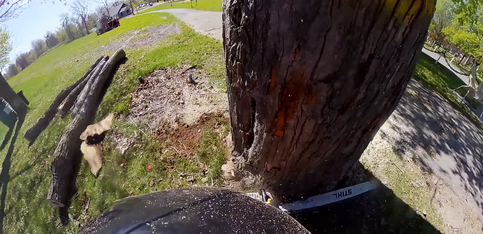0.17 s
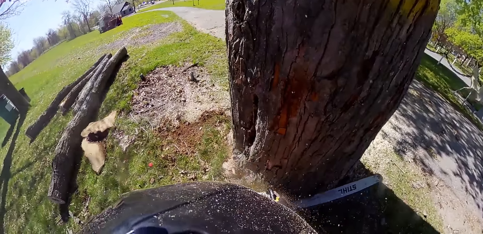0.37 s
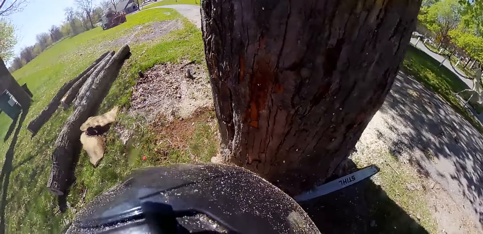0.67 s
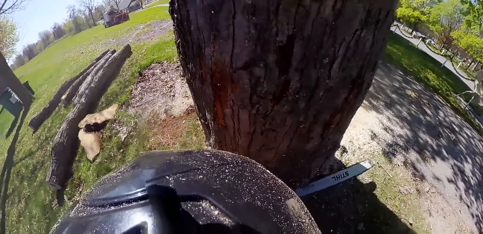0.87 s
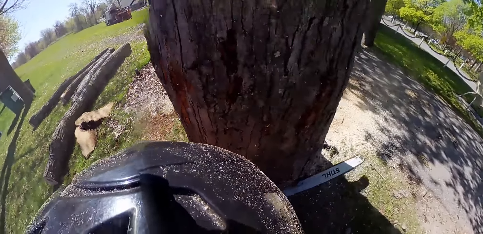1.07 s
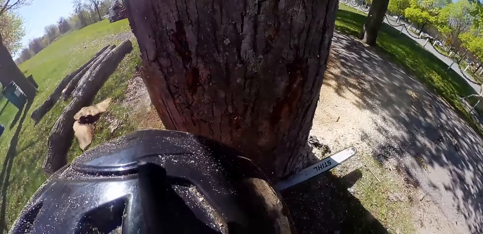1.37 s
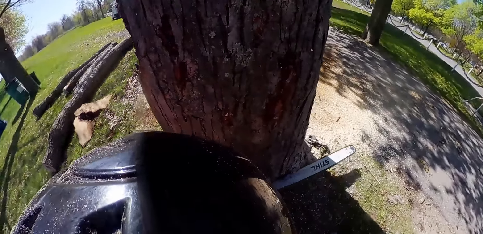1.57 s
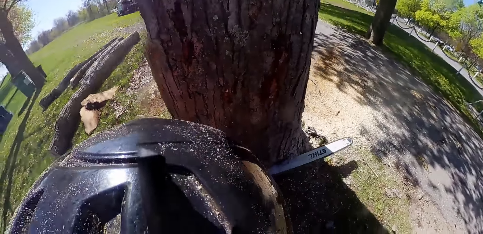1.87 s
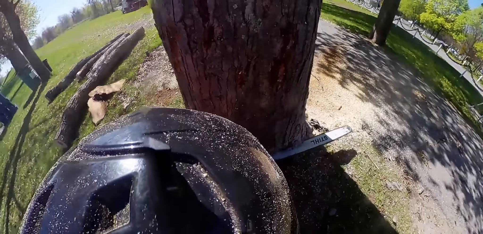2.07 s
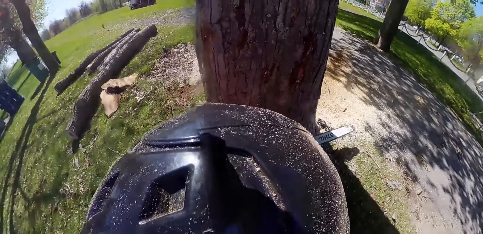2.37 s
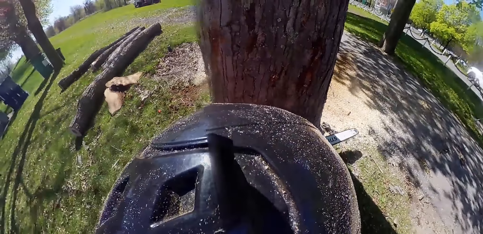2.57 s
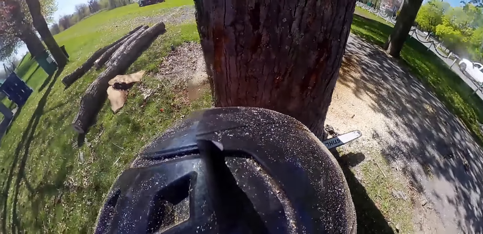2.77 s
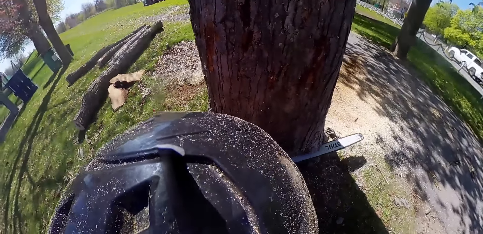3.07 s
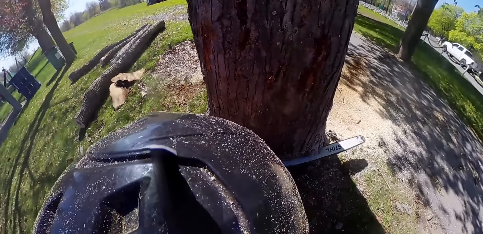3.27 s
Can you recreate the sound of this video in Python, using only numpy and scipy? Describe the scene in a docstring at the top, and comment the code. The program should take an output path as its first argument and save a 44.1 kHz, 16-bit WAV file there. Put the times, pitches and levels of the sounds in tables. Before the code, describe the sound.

A petrol chainsaw at full throttle, already running, cuts a big trunk outdoors, close and dry at helmet position, centred. A bright, dense nasal buzz with gritty rasp holds at first; a faint dull knock at 0.35 s, then rapid wood snaps at 0.5-0.56 s. Short metallic rings flicker throughout. Pitch sags unevenly from 1.4 s, briefly recovers near 2.05, then drops to a labouring, fluttering growl with faint low hum until the 3.4 s cutoff.

```python
"""A two-stroke chainsaw at full throttle cuts a thick trunk outdoors, heard from inside the sawyer's helmet.
The engine sags as the chain bites deeper: sine harmonics of the crank speed slide through fixed resonances.
The teeth rasp as coloured noise pulsing with the crank; narrow resonances of the saw ring in bursts.
A dull knock and then a run of snaps from the wood are dying noise bursts; late on a low sine hums."""
import sys
import numpy as np
from scipy import signal
from scipy.fft import rfft, irfft
from scipy.io import wavfile
from scipy.ndimage import uniform_filter1d

SR = 44100
rng = np.random.default_rng(int(sys.argv[2]) if len(sys.argv) > 2 else 0)


def master(y):
    """Save y as 16-bit WAV."""
    cut = np.clip(np.atleast_2d(y).T, -1, 1)
    pcm = np.round(cut * 32767)  # scale
    wavfile.write(sys.argv[1], SR, pcm.astype(np.int16))


N = 151263
TIME = np.arange(N) / SR
FLUTTER_PER_S = 9  # slow level flutter of the harmonics and the hum


def from_db(db):
    """Decibels to gain."""
    return np.exp(np.asarray(db) * (np.log(10) / 20))


def in_time(rows):
    """Each column of a breakpoint curve, interpolated at every sample."""
    s, *columns = np.transpose(rows)
    return [np.interp(TIME, s, column) for column in columns]


def at_hz(points, hz):
    """Read a spectrum on a log-frequency axis."""
    f, db = np.transpose(points)
    return np.interp(np.log(hz + 1e-9), np.log(f), db)


def shares(centres_hz, hz):
    """How much a frequency belongs to each of several overlapping ranges."""
    count = len(centres_hz)
    place = np.interp(np.log(hz + 1e-9), np.log(centres_hz), np.arange(count))
    return [np.maximum(1 - np.abs(place - k), 0) for k in range(count)]


def drift(rate):
    """Smooth chance with a spread near 1: noise through two equal low-pass poles at the given rate in Hz."""
    step = 20  # computed at every 20th sample, with straight lines between
    pole = np.exp(-2 * np.pi * rate * step / SR)
    noise = rng.standard_normal(N // step + 2002)
    slow = signal.lfilter([1], [1, -2 * pole, pole * pole], noise)[2000:]  # skip the settling
    slow = slow / slow.std()
    between = np.arange(step) / step
    lines = slow[:-1, None] + np.diff(slow)[:, None] * between
    return lines.ravel()[:N]


def colour(x, spectrum):
    """Give noise a spectrum in dB per Hz."""
    hz = np.arange(N // 2 + 1) * SR / N
    return irfft(rfft(x) * from_db(at_hz(spectrum, hz)), N) * np.sqrt(SR / 2)


def hum():
    """A faint low sine of steady pitch comes in and beats against the sagging engine."""
    hum_hz, level_db, waver_db = 145.5, -64, 2.5
    start_s, rise_s = 2.1, .25
    rise = np.clip((TIME - start_s) / rise_s, 0, 1)
    level = from_db(level_db + waver_db * drift(FLUTTER_PER_S))
    return rise * level * np.sqrt(2) * np.sin(2 * np.pi * hum_hz * TIME)


def wood(events, spectrum):
    """Wood gives way in sudden noise bursts that die away exponentially, coloured by its resonances."""
    trim_db, attack_s = -55, .0003
    burst = 0
    for s, db, t60 in events:
        age = np.maximum(TIME - s, 0)
        attack = 1 - np.exp(-age / attack_s)
        decay = from_db(trim_db + db - 60 * age / t60)
        burst = burst + rng.standard_normal(N) * attack * decay
    return colour(burst, spectrum)


def knock():
    """A faint dull knock of wood shortly before the cracks: a dark noise burst."""
    # when it falls: (t/s, relative level/dB, t60/s)
    knocks = [(.349, -13, .14)]
    # resonances of the knocked wood: (f/Hz, relative density/dB per Hz)
    knock_body = [(60, -45), (300, -16), (480, -8), (750, 9), (1000, -4), (1500, -3), (3000, -26),
                  (15000, -40)]
    return wood(knocks, knock_body)


def cracks():
    """The wood cracks in a run of snaps, each with a hollow body and a bright splintering edge."""
    # the snaps: (t/s, relative body level/dB, t60/s, relative splinter level/dB)
    snaps = [(.5, -9, .04, 1), (.504, -3, .04, -7), (.5105, -1, .03, -7), (.5165, -8, .03, -20),
             (.523, -1, .035, -14), (.531, -7, .04, -14), (.538, -3, .06, -20), (.551, -12, .04, -20),
             (.562, -11, .04, -20)]
    # hollow resonance of the wood: (f/Hz, relative density/dB per Hz)
    hollow_body = [(60, -46), (130, -29), (180, -13), (300, -19), (450, 2), (600, -1), (850, 2), (1050, -1),
                   (1300, 3), (1510, 10), (1800, -3), (3000, -10), (5000, -14), (8000, -30), (15000, -42)]
    # bright edge of the tearing fibres: (f/Hz, relative density/dB per Hz)
    splinter_edge = [(1000, -33), (2900, -2), (3500, -5), (3800, 10.5), (4200, -1), (5500, -17),
                     (8000, -21), (15000, -44)]
    body = wood([(s, db, t60) for s, db, t60, _ in snaps], hollow_body)
    splinter = wood([(s, db, t60) for s, _, t60, db in snaps], splinter_edge)
    return body + splinter


def ringing(turns):
    """A jolt with every turn and the scrape of the teeth drive narrow resonances, in bursts."""
    # the saw rings up as the chain grabs: (t/s, length/s, relative level/dB rms, f/Hz)
    ring_bursts = [(.885, .035, -37, 1850), (.93, .056, -31.5, 1850), (1.03, .08, -40, 1880),
                   (1.135, .04, -33, 1860), (1.18, .058, -30, 1865), (1.26, .03, -37, 1880),
                   (1.31, .025, -33, 1885), (1.35, .045, -29, 1860), (1.405, .04, -33, 1830),
                   (1.6, .11, -37, 1890), (1.75, .025, -35, 1865), (1.775, .055, -31, 3270),
                   (1.94, .045, -33, 3060), (2.11, .03, -35, 3660), (2.762, .06, -39, 1900),
                   (2.825, .03, -34, 3250), (2.855, .083, -30.5, 1880), (2.972, .045, -32, 1800),
                   (3.04, .028, -34, 1865), (3.23, .06, -34, 1900)]
    scrape, trim_db = .55, -1.3  # scrape is relative to the jolts
    width_hz, edge_s, even_s = 90, .012, .02
    jolts = np.diff(np.floor(turns), prepend=0)
    drive = jolts / jolts.std() + scrape * rng.standard_normal(N)
    out = np.zeros(N)
    for s, length, db, hz in ring_bursts:
        gate = np.clip(np.minimum(TIME - s, s + length - TIME) / edge_s + .5, 0, 1)
        on = gate > 0
        band = signal.butter(2, [hz - width_hz / 2, hz + width_hz / 2], "band", fs=SR, output="sos")
        ring = signal.sosfilt(band, drive)[on]
        # even out the level inside the burst
        running_rms = np.sqrt(uniform_filter1d(ring ** 2, int(even_s * SR)) + 1e-12)
        out[on] += from_db(trim_db + db) * gate[on] * ring / running_rms
    return out


def rasp(turns):
    """Teeth and exhaust gas: gritty noise that surges with every turn, with the ticks of flying chips."""
    # tone of the rasp: (f/Hz, relative density/dB per Hz)
    rasp_tone = [(30, -42), (70, -45), (130, -27), (200, -30.5), (320, -31.5), (400, -23.5), (490, -7.5),
                 (620, -13), (760, -11), (930, -4), (1100, -7), (1350, 0), (1600, 0.5), (1850, 8),
                 (2150, -2), (2600, -1), (3200, 7), (4000, 4.5), (5000, -3), (6300, -4), (7300, -15),
                 (8100, -16.5), (8800, -13), (9500, -20), (10200, -17), (11300, -23.5), (12300, -21.5),
                 (13800, -29), (15300, -27.5)]
    # swell of four ranges: (t/s, low level/dB, middle level/dB, upper level/dB, treble level/dB), relative
    rasp_swells = [(0, 1, 2.5, 4, 5), (0.2, -0.5, -0.5, 2, 1), (0.36, 1, 2, -2.5, 0.3),
                   (0.44, 3.5, -1, -0.5, 0), (0.62, 4.5, 0.5, -3, -1), (0.76, -1, 0.5, -2.5, 1.5),
                   (0.88, 2, -0.5, 3.5, 1.5), (1.0, 3, 3, -3, 1), (1.15, 0.5, 1.5, -3.5, 2.5),
                   (1.36, -0.5, 1, -2.5, 2.7), (1.48, -1, -0.5, -3, 0), (1.6, -1.5, -2.0, -5, 0.9),
                   (1.9, 2.5, 3.5, -2, 1.5), (2.02, -0.5, 5.5, -0.5, 5), (2.2, 2, -2.5, -2.5, -0.4),
                   (2.42, 3, 1.5, -4.5, -1.5), (2.62, 2, 0, -5, 0.5), (2.8, 2.5, 2, -2, 0.5),
                   (3.03, 3.5, 1.5, -7.5, -2), (3.22, 5, 2, 4, 1.2), (3.43, -2, 2, -8, -1)]
    # centres of those ranges: (f/Hz)
    rasp_centres = [750, 1880, 3150, 5400]
    trim_db, waver_db, waver_per_s = -69, 1.1, 3.5
    pulse_depth, grit_db, grit_per_s = .12, .4, 140
    chips_per_s, chip_db, chip_spread_db = 120, 6, 2.2

    pulse = 1 + pulse_depth * np.cos(2 * np.pi * turns)
    surge = pulse * from_db(grit_db * drift(grit_per_s))
    extra = np.minimum(rng.exponential(1, N), 4)  # a few chips tick much louder
    sizes = from_db(chip_db + chip_spread_db * extra) * rng.choice([-1, 1], N)
    chips = sizes * (rng.random(N) < chips_per_s / SR)
    noise = rfft(colour(surge * rng.standard_normal(N) + chips, rasp_tone))

    weights = shares(rasp_centres, np.arange(len(noise)) * SR / N)
    out = 0
    for weight, swell in zip(weights, in_time(rasp_swells)):
        level = from_db(trim_db + swell + waver_db * drift(waver_per_s))
        out = out + irfft(noise * weight, N) * level
    return out


def harmonic(turns, multiple, hz):
    """One multiple of the crank's turning, a sine; it wavers as the sound paths shift, rougher when high."""
    # fast roughness by pitch: (f/Hz, level flutter/dB, phase flutter/turns)
    roughness = [(900, .8, .02), (1800, 1.1, .025), (3300, 1.4, .03), (5000, 1.3, .035)]
    rough_per_s, flutter_db = 45, 1.6
    shimmer_turns, shimmer_per_s = .05, 7
    f, rough_db, rough_turns = np.transpose(roughness)
    phase = multiple * turns + rng.random() + shimmer_turns * drift(shimmer_per_s)
    phase = phase + np.interp(hz, f, rough_turns) * drift(rough_per_s)
    level_db = flutter_db * drift(FLUTTER_PER_S) + np.interp(hz, f, rough_db) * drift(rough_per_s)
    return np.sqrt(2) * from_db(level_db) * np.sin(2 * np.pi * phase)


def engine(speed, turns, count=38):
    """Uneven firings; their harmonics slide through fixed resonances, a few of them raised to a whine."""
    # muffler resonances, the strength of a harmonic by pitch: (f/Hz, level/dB before the trims below)
    muffler = [(135, -64), (185, -55), (225, -65.5), (290, -61.5), (360, -58), (430, -58.5), (560, -42),
               (630, -61), (680, -60), (760, -37.5), (840, -37.5), (920, -34.5), (1050, -54.5),
               (1250, -42.5), (1500, -42), (1650, -41.5), (1850, -34.5), (2020, -42), (2200, -46.5),
               (2650, -52), (3000, -45), (3350, -45.5), (3750, -46.5), (4150, -54.5), (4550, -51),
               (5300, -51.5), (6500, -74.5)]
    # the low multiples of the crank speed are unequal: (multiple, relative level/dB)
    order_levels = [(1, 2.7), (2, -6.1), (3, 2.1), (4, -2.8), (5, 0.4), (6, 1.6), (7, -0.5), (8, -0.5),
                    (9, 1.4), (10, -0.9), (11, 0)]
    # swell of four ranges as saw and head move:
    # (t/s, low level/dB, middle level/dB, upper level/dB, treble level/dB), relative
    tone_swells = [(0, 0.5, 6.5, 11, 0), (0.13, 10.5, 7, 5.5, 6), (0.33, 4, 7, 7, 5),
                   (0.45, -7.5, 5.5, 1.5, 1), (0.65, 4, 4.5, -8, 2), (0.82, 5, -4, -0.5, -1.5),
                   (0.95, -1.5, -6, 2, 0.5), (1.04, 5, -6, 2, 3), (1.2, 5.5, -8, 4.5, 0.5),
                   (1.36, 2, -10, 4.5, -1.5), (1.5, -10, 0, -2.5, -0.5), (1.66, -6.5, 3, 0.5, 3),
                   (1.85, -19.5, 6, -5.5, 1), (2.02, -2, 4.5, 0.5, 6.5), (2.17, -5, 0.5, -1, 0.5),
                   (2.38, -0.5, -3.5, -11.5, -5), (2.55, 0.5, 3.5, -4.1, 0.5), (2.7, 1.5, -1, -2, 1.7),
                   (2.88, 2, 2.5, -6.5, -3), (3.08, 3.5, -1.9, -5, 2.5), (3.2, -0.5, 5.5, -3, -3),
                   (3.43, -2, -3, -4, 7.5)]
    # centres of those ranges: (f/Hz)
    tone_centres = [778, 1200, 1770, 3020]
    # multiples of the crank speed on which the chain drive whines: (multiple)
    whine_orders = (16, 17, 18, 20, 22)
    # whine over the engine's own level: (t/s, then one level/dB for each of those multiples)
    whine_levels = [(0, -3, 4, -5, -2, -5), (.1, -3, 4, -4, 1, 0), (.3, -4, 5, -4, -4, 9),
                    (.44, -2, -1, -4, 3, 4), (.6, 5, 1, 0, 2, 8), (.75, 4, 3, 1, 5, 12),
                    (.9, 5, 4, 2, 6, 9), (1.1, 4, -1, 4, 6, 3), (1.31, 6, -2, 5, 8, 16),
                    (1.43, 3, 0, 4, 8, 13), (1.52, -2, -2, 3, 14, 3), (1.66, -2, -2, 8, 11, 1),
                    (1.76, 0, -2, 1, -1, 4), (1.92, 1, 4, 3, 3, 6), (2.0, 7, 2, 2, 11, 9),
                    (2.08, 3, 1, 2, 12, 9), (2.14, 0, 0, 2, 7, 3), (2.25, 0, 0, 0, 2, 3),
                    (2.5, 0, 0, 0, 0, 2), (2.75, 0, 0, 2, 4, 8), (3.0, 0, 0, 0, 6, 4),
                    (3.43, 0, 0, 0, 0, 1)]
    # colour at first, while the head is bent over the saw: (f/Hz, relative level/dB)
    early_colour = [(450, 2), (675, 11), (900, -7.5), (1130, -2), (1350, -6.5), (1800, -3.5), (2030, 2.5),
                    (2250, 0), (2950, 4), (3400, 6), (3850, 0.5), (4500, -1.5)]
    # colour as the head turns away: (f/Hz, relative level/dB)
    turned_colour = [(640, 0), (840, -2), (1050, 8), (1260, -1), (1470, 0), (1680, -2), (1880, -8),
                     (2100, 3), (2300, 8), (2520, 8), (2730, 5), (2950, 0)]
    # how far the head is turned away: (t/s, share/0-1)
    turned_share = [(.5, 0), (.6, 1), (.84, 1), (.92, .2), (1.3, .3), (1.45, 0)]
    early_until_s, early_fade_s = .477, .059  # midpoint and length of the fade
    trim_db, firing_spread_db = -.5, .3

    swells = [0] + in_time(tone_swells)  # the bass range stays level
    centres = [340, *tone_centres]  # Hz
    whine = dict(zip(whine_orders, in_time(whine_levels)))
    early = np.clip((early_until_s - TIME) / early_fade_s + .5, 0, 1)
    turned, = in_time(turned_share)
    out = 0
    for k in range(1, count + 1):
        hz = k * speed
        swell = sum(weight * db for weight, db in zip(shares(centres, hz), swells))
        emphasis = np.interp(k, *np.transpose(order_levels)) + whine.get(k, 0)
        body = at_hz(muffler, hz)
        body = body + early * at_hz(early_colour, hz) + turned * at_hz(turned_colour, hz)
        out = out + from_db(body + emphasis + swell) * harmonic(turns, k, hz.mean())
    # one chance strength per turn, gliding to the next
    firings = np.interp(turns, np.arange(N), rng.standard_normal(N))
    return out * from_db(trim_db + firing_spread_db * firings)


def scene():
    """Saw and trunk are straight ahead, alike in both ears; one crank angle drives rasp, ring and engine."""
    # crank speed, one firing per turn: (t/s, f/Hz)
    crank_speed = [(0.0, 223.0), (0.25, 226.9), (0.36, 224.0), (0.55, 212.6), (0.8, 207.4), (0.95, 203.6),
                   (1.04, 209.7), (1.18, 205.1), (1.33, 210.2), (1.42, 201.8), (1.51, 184.2), (1.66, 190.8),
                   (1.78, 170.0), (1.86, 175.0), (1.95, 189.2), (2.06, 207.4), (2.13, 182.6), (2.2, 159.0),
                   (2.26, 142.4), (2.42, 132.6), (2.55, 139.0), (2.68, 148.6), (2.8, 144.4), (2.88, 134.0),
                   (3.0, 127.0), (3.1, 132.6), (3.17, 149.4), (3.27, 134.2), (3.38, 149.2), (3.43, 140.2)]
    jitter_turns, jitter_per_s = .003, 35
    wander_turns, wander_per_s = .008, 6
    speed, = in_time(crank_speed)
    turns = np.cumsum(speed) / SR
    turns = turns + jitter_turns * drift(jitter_per_s) + wander_turns * drift(wander_per_s)
    sound = hum() + knock() + cracks() + ringing(turns) + rasp(turns) + engine(speed, turns)
    return np.array([sound, sound])


def record(dry):
    """A brief fade-in; a steep low-pass cuts the top."""
    fade_in_s, cutoff_hz = .004, 15700
    faded = dry * np.minimum(TIME / fade_in_s, 1)
    low_pass = signal.ellip(12, .1, 90, cutoff_hz, fs=SR, output="sos")
    return signal.sosfilt(low_pass, faded)


dry = scene()
out = record(dry)
master(out)
```